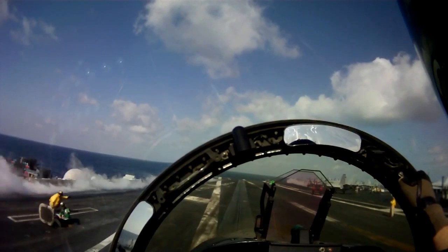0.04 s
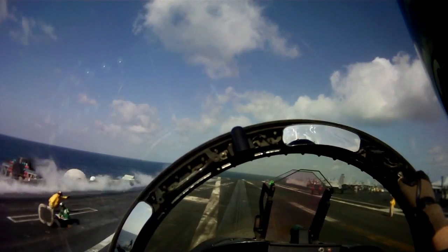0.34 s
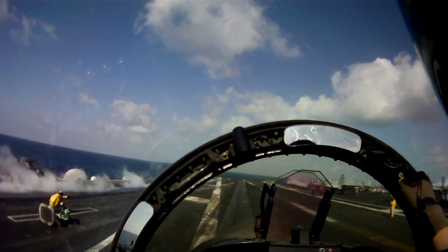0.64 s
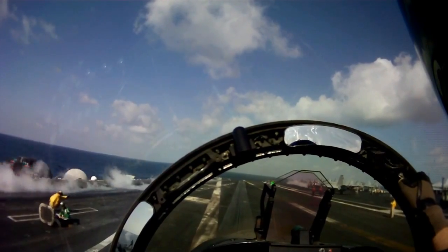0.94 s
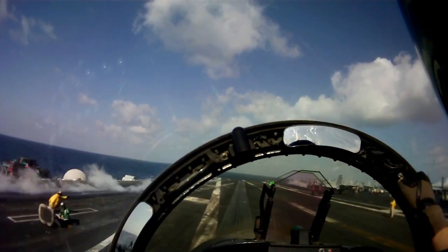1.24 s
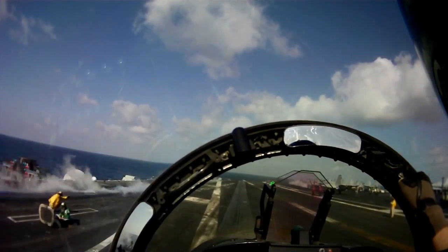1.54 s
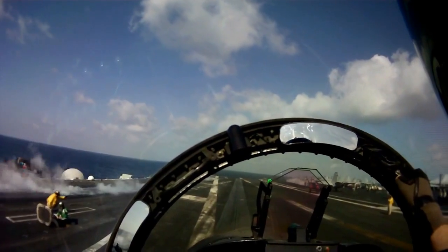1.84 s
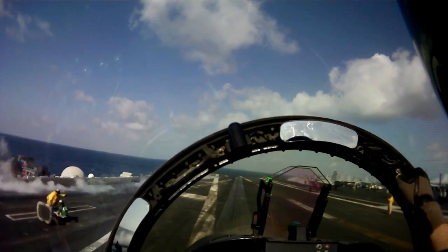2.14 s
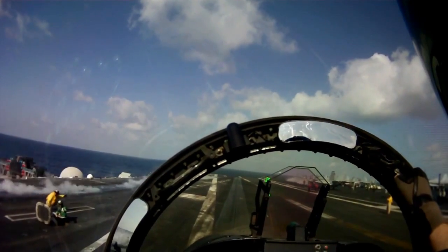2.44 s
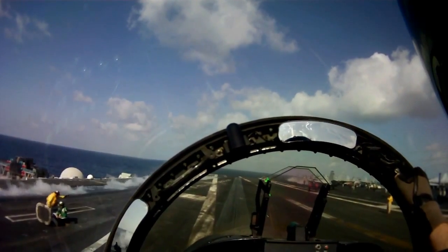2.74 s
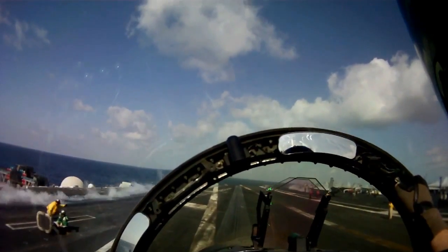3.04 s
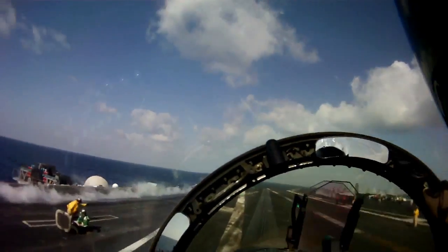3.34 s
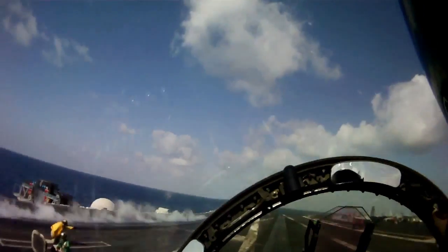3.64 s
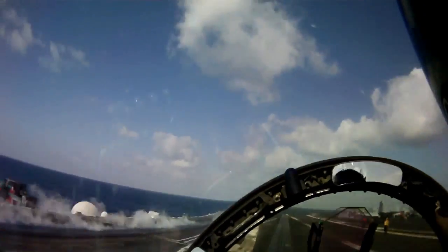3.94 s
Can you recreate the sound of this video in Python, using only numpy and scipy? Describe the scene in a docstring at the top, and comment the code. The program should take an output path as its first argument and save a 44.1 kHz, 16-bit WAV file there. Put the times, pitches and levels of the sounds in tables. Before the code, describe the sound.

Loud crackling jet engine roar with a high whine, ending in a thump and rattling rumble.

```python
"""In the cockpit of a jet on a carrier catapult, with the engine at full power.
The exhaust roars and its shock waves crackle; the intake hisses and the turbine blades whine.
The catapult fires with a jolt, and the airframe shakes and drones down the track.
The sound overloads the recorder: each big swing of the roar chops the treble,
and the jolt makes it turn the volume down for a moment."""
import sys
import numpy as np
from scipy import signal
from scipy.fft import rfft, irfft
from scipy.io import wavfile
from scipy.ndimage import uniform_filter1d

SR = 44100
rng = np.random.default_rng(int(sys.argv[2]) if len(sys.argv) > 2 else 0)


def dump_mix(stems):
    """Bounce the given channels to the path in sys.argv[1] as a 16-bit WAV at rate SR."""
    frames = np.atleast_2d(stems).T  # one column per channel
    limited = np.clip(frames, -1, 1)  # hard clip at full scale
    pcm = np.round(limited * 32767).astype(np.int16)
    wavfile.write(sys.argv[1], SR, pcm)


N = 176400
T, HZ = np.arange(N) / SR, np.fft.rfftfreq(N, 1 / SR)
LAUNCH_S = 3.1577


def amp(db):
    """Turns decibels into a number to multiply by."""
    return 10 ** (np.asarray(db) / 20)


def level(points):
    """Volume over time, drawn through (time [s], level [dB]) points."""
    return amp(np.interp(T, *np.transpose(points)))


def spectrum(points, peaks=()):
    """How strong each frequency is, in dB: a smooth curve with narrow peaks or dips added."""
    freqs, db = np.transpose(points)
    bumps = sum(boost * np.exp(-2 * ((HZ - hz) / width) ** 2) for hz, width, boost in peaks)
    return np.interp(np.log(HZ + 1), np.log(freqs), db) + bumps


def colour(x, db):
    """Filters a sound by a spectrum, then sets its average strength (rms) to 1."""
    shaped = irfft(rfft(x) * amp(db), N)
    return shaped / np.sqrt(np.mean(shaped ** 2) + 1e-20)


def noise(db):
    """Random noise of strength 1 with the given spectrum."""
    return colour(rng.standard_normal(N), db)


def flutter(slow_hz=3.3, fast_hz=25.5):
    """The slow, random wobble of swirling air, strongest near slow_hz."""
    power = (HZ + 1e-6) / (HZ ** 2 + slow_hz ** 2) / (1 + (HZ / fast_hz) ** 2) ** 2
    return noise(10 * np.log10(power))


def crackle(cracks_per_s=200, spread_db=5.5):
    """Shock waves from the exhaust arrive as clicks of random size at random times."""
    # tone of the cracks, dulled by the canopy (frequency [Hz], level [dB])
    crack_tone = [(100, 0), (400, -2), (800, 1.5), (1350, 0), (1800, -8.5), (2600, -15), (5000, -59)]
    hits = rng.random(N) < cracks_per_s / SR
    size = np.minimum(rng.exponential(1, N), 3)
    shocks = hits * amp(spread_db * size) * rng.choice([-1, 1], N)
    return colour(shocks, spectrum(crack_tone))


def exhaust(crackle_db=-19, flutter_db=0.36):
    """The exhaust makes a deep, unsteady, crackling roar that rings in the cockpit."""
    # tone of the roar (frequency [Hz], level [dB])
    roar_tone = [(20, -14), (50, -15.5), (80, -6), (130, -6.5), (180, -5), (300, -5), (450, -3.5),
                 (680, -9), (850, -16), (1050, -30.5), (1500, -48.5), (3000, -61), (15000, -90)]
    # pitches at which the cockpit rings (frequency [Hz], width [Hz], boost [dB])
    cockpit_rings = [(98, 19, 8), (180, 30, 1.5), (243, 22, 3), (333, 26, 6.2), (402, 28, 4),
                     (491, 22, 5.5), (536, 28, 5.5)]
    # loudness of the roar (time [s], level [dB])
    roar_levels = [(0, -3.5), (1.5, -3.5), (2.85, -3), (2.95, -5), (3.14, -4), (3.19, -3.5), (3.3, -2),
                   (3.42, -5), (3.62, -6), (3.76, -7), (3.87, -4.5), (3.94, -8.5), (4, -5)]
    cracks = amp(crackle_db) * crackle()
    volume = level(roar_levels) * amp(flutter_db * flutter())
    return volume * (noise(spectrum(roar_tone, cockpit_rings)) + cracks)


def blade_whine(pitch_hz=3520, wander_hz=1.9, flutter_db=1.3, fade_db_per_s=7):
    """The spinning turbine blades sing one high note, which fades once the jet moves."""
    # the note and its overtones (multiple of the pitch, level against the hiss [dB])
    harmonics = [(1, -5), (2, -16), (3, -32), (4, -38)]
    phase = 2 * np.pi * np.cumsum(pitch_hz + wander_hz * flutter()) / SR
    whine = sum(2 ** .5 * amp(db + flutter_db * flutter()) * np.sin(k * phase) for k, db in harmonics)
    return whine * amp(-fade_db_per_s * np.maximum(T - LAUNCH_S, 0))


def turbine(flutter_db=1.24):
    """Air rushing into the intake hisses; the hiss and the blade whine flutter together."""
    # tone of the intake hiss (frequency [Hz], level [dB])
    hiss_tone = [(500, -4.5), (1500, -11.5), (2050, -8), (2700, -4), (3150, -3.5), (3480, 2.5), (3850, -4),
                 (4400, -2), (4650, -11), (5100, -8), (5650, -13.5), (6900, -7.5), (7350, -14),
                 (8600, -16.5), (11000, -21), (13000, -26.5), (15000, -31)]
    # faint whistles and one dip in the hiss (frequency [Hz], width [Hz], boost [dB])
    whistles = [(2755, 25, 2), (2900, 70, -2.5), (2998, 45, 5), (3750, 28, 4.5), (3910, 30, 3),
                (4175, 40, 3), (4390, 70, 3), (6294, 60, 3), (7670, 55, 4.5), (8343, 45, 3.5),
                (9172, 90, 3)]
    # loudness of hiss and whine together (time [s], level [dB])
    treble_levels = [(0, -17), (.1, -18), (.2, -17), (.85, -17.5), (.93, -17), (1.02, -18), (1.1, -15.5),
                     (1.7, -17.5), (2.05, -15.5), (2.3, -16), (2.6, -17), (2.87, -17), (2.94, -18.5),
                     (3.14, -15.5), (3.19, -16.5), (3.26, -12.5), (3.33, -18), (3.44, -17.5), (3.52, -18.5),
                     (3.61, -13.5), (3.69, -22.5), (3.78, -18), (3.82, -21), (3.86, -16), (3.94, -22),
                     (4, -20)]
    treble = noise(spectrum(hiss_tone, whistles)) + blade_whine()
    return level(treble_levels) * amp(flutter_db * flutter()) * treble


def airframe_shake():
    """The jet's body rumbles as the catapult takes the strain and then fires."""
    # tone of the shaking (frequency [Hz], level [dB])
    shake_tone = [(15, -10), (40, -1), (70, 0.5), (110, 4), (200, -3.5), (400, -7.5), (1000, -29.5),
                  (2500, -38), (4300, -38), (5500, -62), (15000, -90)]
    # loudness of the shaking (time [s], level [dB])
    shake_levels = [(0, -26), (2.85, -33), (2.92, -4), (3.03, -16), (3.14, -7), (3.19, 6.5), (3.3, 2.5),
                    (3.42, -11), (3.52, -5.5), (3.65, -10), (4, -14)]
    return level(shake_levels) * noise(spectrum(shake_tone))


def catapult_jolt(pitch_hz=104, level_db=34, ring_s=.036):
    """The catapult fires: one heavy thump that dies away by 60 dB in ring_s."""
    age = np.maximum(T - LAUNCH_S, 0)
    return amp(level_db - 60 * age / ring_s) * np.sin(2 * np.pi * pitch_hz * age)


def track_drone(width_hz=50):
    """The jet's body gives a growing, wavering drone as it runs along the track."""
    # pitch of the drone (time [s], pitch [Hz])
    pitches = [(3.45, 388.4), (3.6, 376.3), (3.66, 325.5), (3.73, 334.3), (3.8, 272), (3.9, 279.6),
               (4, 319)]
    # loudness of the drone (time [s], level [dB])
    drone_levels = [(3.2, -40), (3.4, -10), (3.55, -13), (3.7, -6.5), (3.81, -7.5), (3.86, -16), (3.93, 0),
                    (4, -12.5)]
    phase = 2 * np.pi * np.cumsum(np.interp(T, *np.transpose(pitches))) / SR
    # slow noise multiplied by a tone makes a rough hum around that pitch
    slow = -20 * np.log10(1 + (2 * HZ / width_hz) ** 2)
    hum = noise(slow) * np.cos(phase) + noise(slow) * np.sin(phase)
    return level(drone_levels) * hum


def gain_control(x, limit_db=1, recover_db_per_s=109, strength=0.61, delay_s=.0105, attack_s=.005):
    """The recorder turns itself down just after an overload, then comes back up."""
    power_db = 10 * np.log10(abs(uniform_filter1d(x[0] ** 2, size=300)) + 1e-12)
    fall_db = T * recover_db_per_s
    held_db = np.maximum.accumulate(power_db + fall_db) - fall_db  # each peak lingers, sinking steadily
    over_db = np.maximum(held_db - limit_db, 0)
    late_db = np.interp(T - delay_s, T, over_db)
    lag = np.exp(-1 / (attack_s * SR))
    smooth_db = signal.lfilter([1 - lag], [1, -lag], late_db)
    return x * amp(-strength * smooth_db)


def scene():
    """Everything that reaches the microphone in the cockpit, in one channel."""
    engine = exhaust() + turbine()
    launch = track_drone() + airframe_shake() + catapult_jolt()
    return (engine + launch)[None]


def record(dry, ceiling_db=1.5, hardness=4.63, leak_db=-33.5, low_cut_hz=1145, top_hz=15030):
    """The recorder turns loud moments down, flattens big swings, and cuts the bass and the very top."""
    x = gain_control(dry)
    flattened = x / (1 + abs(x / amp(ceiling_db)) ** hardness) ** (1 / hardness)
    driven = flattened + amp(leak_db) * x  # a little gets through unflattened
    thin = amp(-3) * signal.lfilter(*signal.butter(1, low_cut_hz, "high", fs=SR), driven)
    top_cut = signal.firwin(511, top_hz, window=("kaiser", 9), fs=SR)
    return signal.oaconvolve(thin, top_cut[None], "same")


dry = scene()
out = record(dry)
dump_mix(out)
```